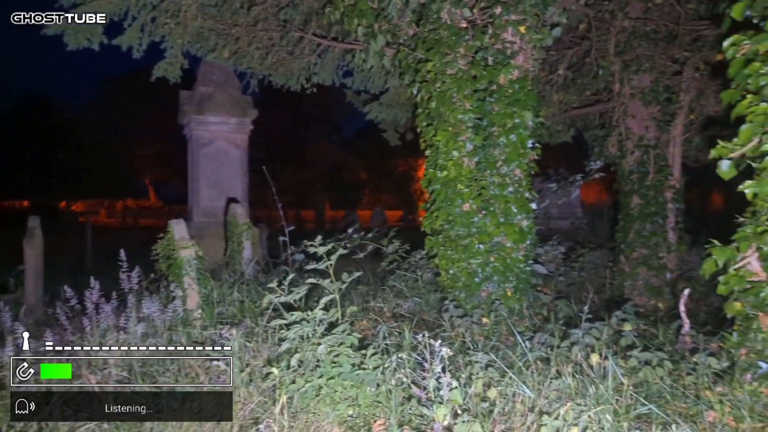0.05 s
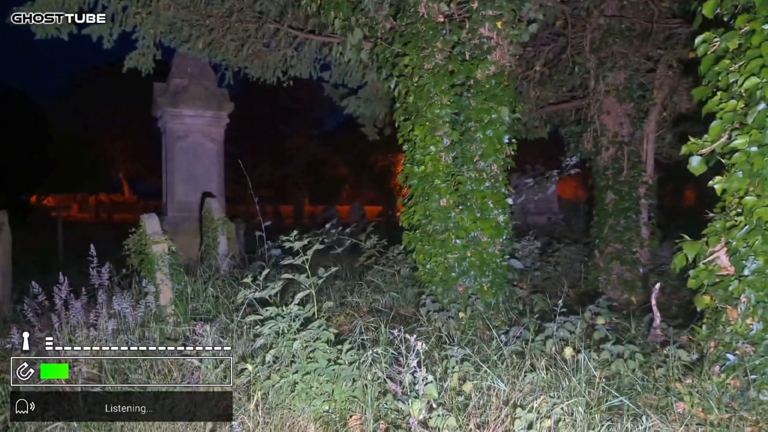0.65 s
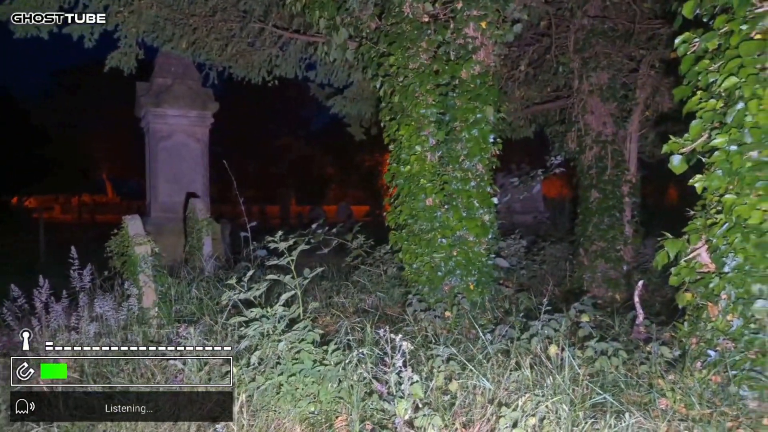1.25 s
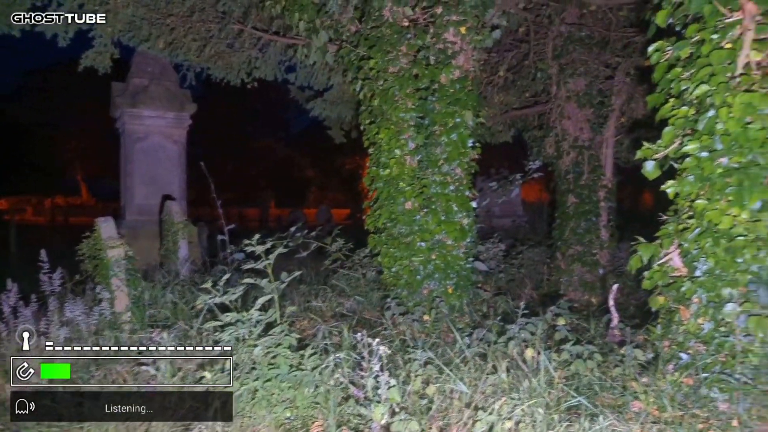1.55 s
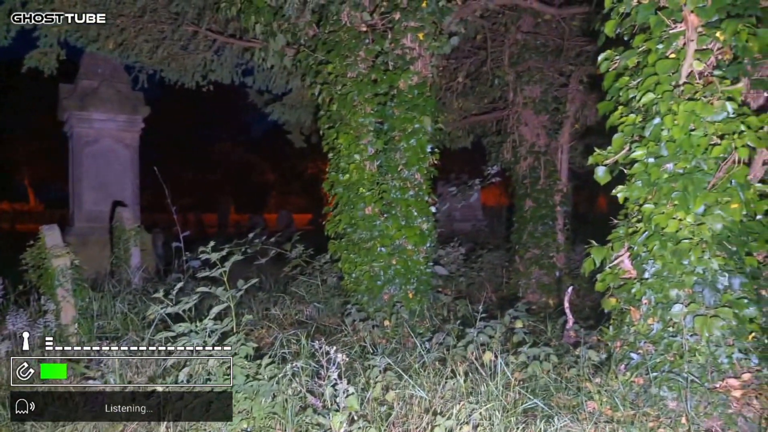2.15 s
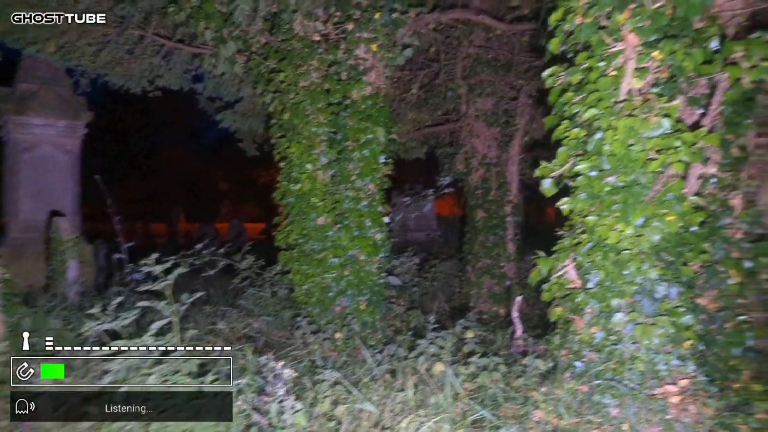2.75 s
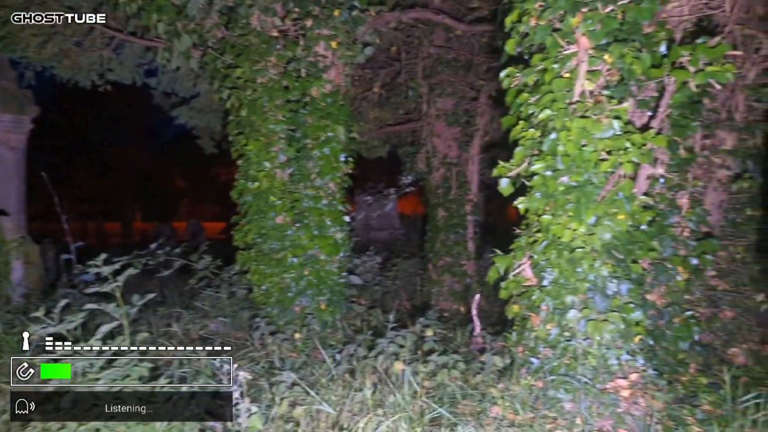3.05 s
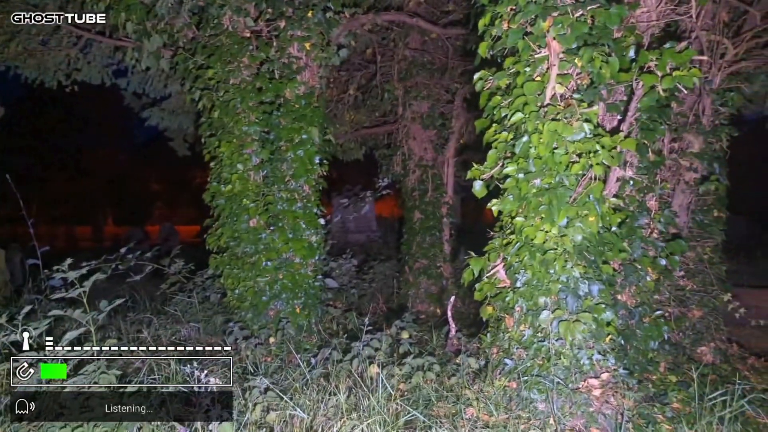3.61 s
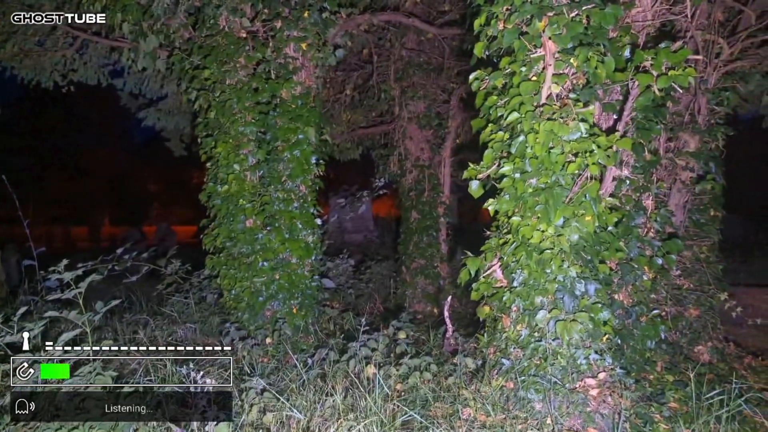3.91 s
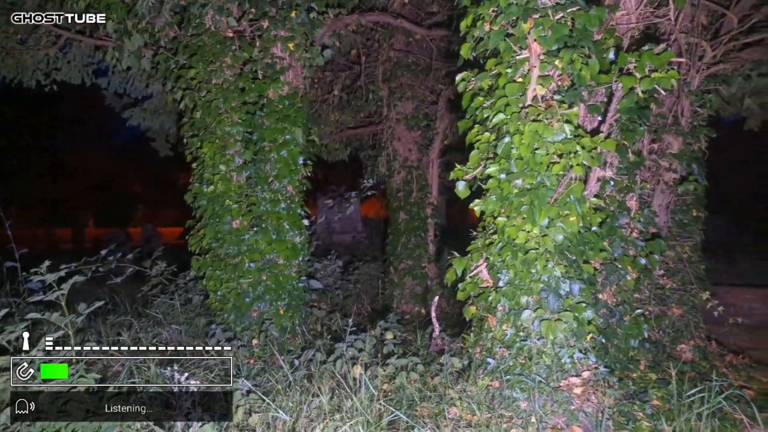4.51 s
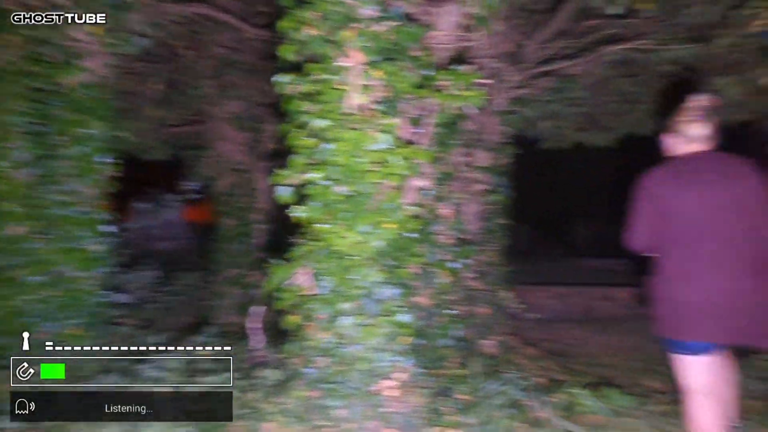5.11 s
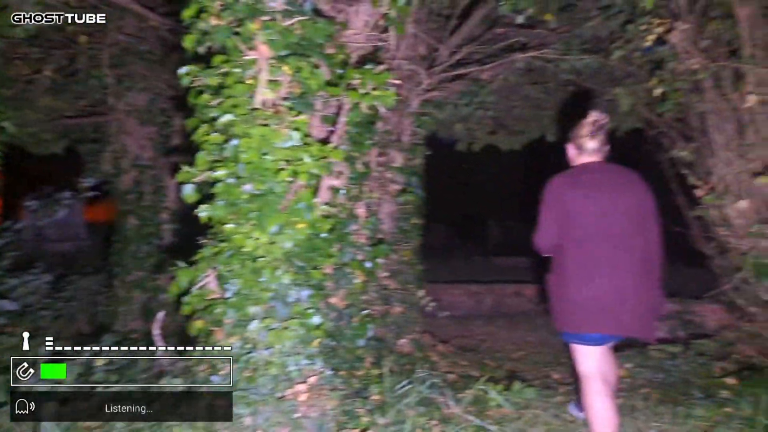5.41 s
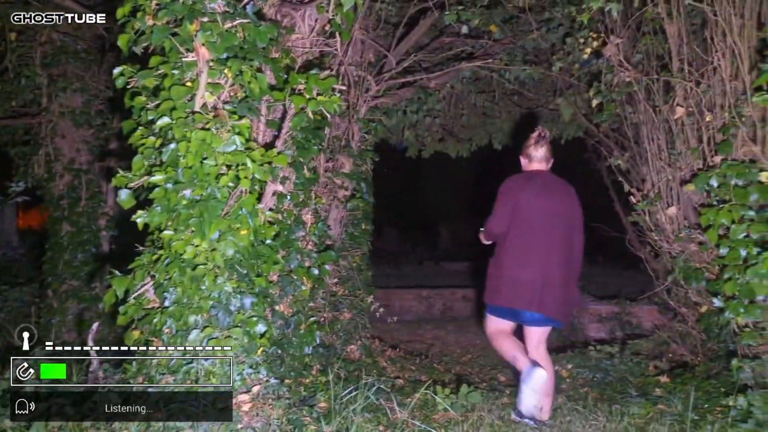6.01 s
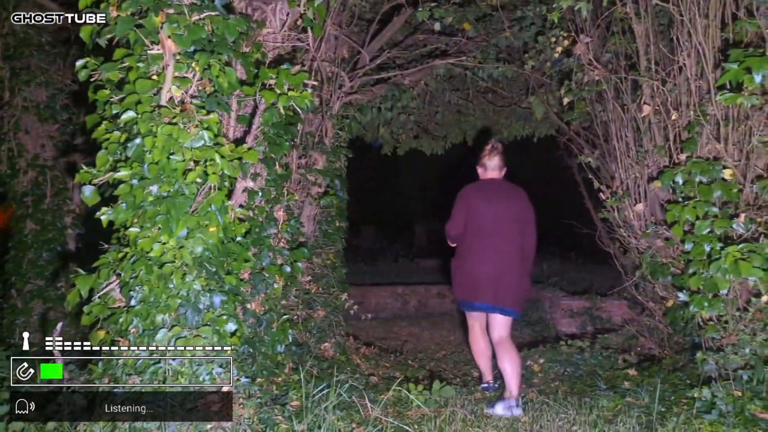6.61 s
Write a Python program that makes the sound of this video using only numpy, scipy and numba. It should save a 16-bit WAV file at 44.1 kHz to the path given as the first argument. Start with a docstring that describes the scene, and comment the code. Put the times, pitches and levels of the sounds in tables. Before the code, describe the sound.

Slow footsteps swish through long grass at night, with twigs ticking and stems cracking sharply close by over a faint low rumble.

```python
"""In long grass and undergrowth at night, someone walks slowly, close to the microphone.
Blades sweep past the legs in crackling swells, and stems crack and knock close by with a dull thump.
Twigs tick, something smooth rubs by in short rising swishes, and a soft, low rustle comes and goes.
Far traffic and a low rumble lie underneath."""
import sys
import numpy as np
from scipy import signal
from scipy.fft import rfft, irfft
from scipy.io import wavfile
from scipy.ndimage import uniform_filter1d
from numba import njit

SR = 44100
rng = np.random.default_rng(int(sys.argv[2]) if len(sys.argv) > 2 else 0)


def log_audio(samples):
    """Write samples as a 16-bit WAV file to the path given in sys.argv[1]."""
    # one column per channel
    frames = np.atleast_2d(samples).T
    # limit to full scale, then quantise
    limited = np.clip(frames, -1, 1)
    pcm = np.round(limited * 32767).astype(np.int16)
    wavfile.write(sys.argv[1], SR, pcm)


N = 298116
TIME = np.arange(N) / SR

# tone colour of scraping blades: f/Hz, relative level/dB
BLADE_SPECTRUM = [(180, -33.5), (300, 0.5), (431, -1.5), (517, -7.5), (720, -4.5), (922, -7.5),
                  (1370, -14.5), (2560, -10), (3230, -12.5), (3510, -11.5), (8990, -16), (10100, -17),
                  (11500, -15.5), (15500, -26)]
# a leg sweeps through the grass: peak t/s, level/dB, rise/s, fall/s, brightness/dB (more = more treble)
LEG_SWEEPS = [ (.8, -59, 0.14, 0.19, -14), (.95, -51.5, 0.086, 0.065, 0), (1.411, -43.5, 0.055, 0.075, 1.5),
              (1.463, -38, 0.089, 0.046, 0), (2.62, -55, 0.096, .06, -8), (2.714, -49.5, 0.064, .07, 1),
              (3.09, -38, 0.037, 0.13, 5), (3.22, -54.5, 0.21, 0.21, -7), (3.474, -42.5, 0.037, 0.053, 1),
              (3.61, -51, 0.31, 0.15, 4.5), (4.074, -45, 0.03, 0.041, -6), (4.108, -40, 0.045, 0.065, 0.5),
              (4.745, -53.5, 0.15, .11, 2.5), (5.53, -59, 0.12, 0.15, -5), (5.91, -49.5, 0.12, 0.1, 1),
              (6.51, -52.5, 0.085, 0.11, -3), (6.755, -45, 0.045, .05, -11)]
# grass stirring between the sweeps: t/s, level/dB
GRASS_STIR = [(0, -72), (2.2, -72.5), (3.1, -65.5), (3.9, -63.5), (5.0, -65.5), (6.2, -72.5), (6.76, -65)]
# stems crack close by: t/s, crack/dB, leaves/dB, thump/dB, thump f/Hz, knock/dB, tilt/(dB per octave)
STEM_CRACKS = [ (4.1018, -22, -33, -33, 155, -29.5, -2.5), (4.1547, -11.5, -28, -18, 149, -32, 3.5),
               (4.2893, -13, -25, -15, 158, -16.5, 5), (4.3376, -30, -44, -32, 160, -30.5, 2.5),
               (5.477, -41, -50, -31.5, 166, -42, -1.5), (5.756, -13.5, -27.5, -21, 104, -36, 0.5),
               (5.8249, -27, -27, -27.5, 118, -27.5, 0.5), (5.8657, -40, -39, -30, 167, -29, -2.5),
               (5.9249, -26, -23, -18, 113, -22.5, -4), (6.523, -33.5, -38, -27.5, 166, -23.5, 3)]
# tone colour of a crack: f/Hz, relative level/dB
CRACK_SPECTRUM = [(150, -20), (400, 9), (800, 5), (1400, -4.5), (2200, 8.5), (3000, 4), (5000, 3),
                  (9000, -5), (13000, -9), (16000, -14)]
# tone colour of shaken leaves: f/Hz, relative level/dB
LEAF_SPECTRUM = [(150, 7.5), (350, -8.5), (750, 0.5), (1400, -2), (2300, 1), (3200, 0.5), (5500, 0.5),
                 (9000, -3.5), (12500, -7), (16000, -19)]
# tones of the thump: multiple of its pitch, relative level/dB, t60/s (time to fade by 60 dB)
THUMP_TONES = [(.7, -22.5, 0.12), (1, -8.5, 0.1), (1.3, 1.5, 0.049), (2.1, -5.5, 0.042), (2.8, -18, 0.066)]
# tones of a thick stem, before STEM_TUNING lowers them: f/Hz, relative level/dB, t60/s
STEM_TONES = [(591, -14.5, 0.056), (734, -1, 0.023), (833, -13, 0.053), (1030, -11, 0.049)]
STEM_TUNING = 0.92
# twigs and stalks tick: t/s, level/dB, f/Hz, width/octaves, t60/s
TWIG_TICKS = [(.18, -55, 3080, 0.45, .023), (.672, -57, 3130, 0.51, 0.052), (0.779, -38.5, 750, 1.1, 0.033),
              (.982, -55, 5000, 2.3, .015), (1.479, -32.5, 3100, 0.91, 0.011),
              (1.489, -33, 4470, 2.6, 0.023), (2.807, -42, 795, 0.82, 0.0097), (2.963, -51, 2160, .7, .019),
              (3.203, -41, 695, 0.73, .045), (3.634, -36.5, 545, 1.6, 0.046), (4.057, -45, 3900, 3.2, .039),
              (4.123, -34, 4000, 0.54, .012), (4.476, -42.5, 5000, 5.6, 0.013),
              (4.551, -33, 4030, 2.2, 0.01), (4.5864, -44, 7260, 1.7, 0.091), (4.587, -35.5, 780, 1, 0.014),
              (4.6384, -30.5, 4660, 2.1, 0.0023), (4.9279, -35.5, 3000, 2.45, 0.0071),
              (5.0073, -40.5, 5300, .6, 0.0058), (5.032, -24, 2070, 1.25, 0.0039),
              (5.059, -44, 6800, .9, 0.017), (5.196, -51, 8000, 1.7, 0.011), (5.476, -35, 2470, 1.2, 0.012),
              (5.6044, -42, 7940, 5.7, 0.011), (5.728, -44.5, 4050, 2.4, .025),
              (6.118, -46.5, 8000, 1.6, 0.01)]
# rubbing swishes: peak t/s, level/dB, rise/s, fall/s, starting f/Hz, climb after the peak/(octaves per s)
RUBS = [(2.587, -38, .014, 0.038, 782, 4), (2.621, -29, 0.027, 0.025, 810, 5.4),
        (2.636, -41, 0.014, 0.011, 2100, 63), (3.292, -43, 0.029, 0.015, 930, 6),
        (4.656, -36.5, 0.026, 0.033, 760, 53), (6.718, -33, 0.0086, 0.0079, 651, 5),
        (6.733, -27, .014, 0.027, 675.6, 56)]
# soft, low swells of rustling noise: peak t/s, level/dB, rise/s, centre f/Hz
LOW_SWELLS = [(0.812, -51.5, 0.13, 665), (2.667, -53.5, 0.24, 450), (3.227, -50.5, 0.38, 600),
              (3.54, -54.5, 0.17, 584), (4.886, -46.5, 0.35, 440), (5.578, -53.5, 0.33, 450),
              (6.298, -60, 0.96, 490)]
# tyres on a far road: t/s, level/dB
TYRE_LEVELS = [(0, -62.5), (.5, -64), (1.1, -74.5), (2, -72), (6.76, -67.5)]
# tone colour of the night air: f/Hz, relative level/dB
AIR_SPECTRUM = [(20, 3), (52, 1), (80, -9), (110, -10.5), (170, -15), (215, -13.5), (300, -18.5),
                (580, -24.5), (950, -29.5), (1350, -40), (2200, -46), (6000, -57.5), (13000, -60),
                (15500, -51)]
# the bass swells and sinks: t/s, change in level/dB
BASS_SWELLS = [(0, -1), (.8, 3.5), (1.1, 0), (2.2, -1), (2.6, 3.5), (3.2, -1), (4.7, 2), (5.3, -.5),
               (6.76, 1)]


def grass():
    """Blades scrape in dense clicks and now and then one catches; each leg sweep swells and dies away."""
    snags = crackle(rate=61, spread_db=1.6)
    burst = rng.standard_normal(SR // 100) * fade(TIME[:SR // 100], 0.024)
    catches = unit(signal.fftconvolve(snags, burst)[:N])
    scraping = crackle(rate=6000, spread_db=2.7)
    blades = colour(unit(scraping + undb(-10) * catches), BLADE_SPECTRUM)
    treble = signal.sosfiltfilt(signal.butter(2, 5500, "high", fs=SR, output="sos"), blades)
    moves = [(undb(db) * swell(s, rise, fall, shape=1.42), bright_db)
             for s, db, rise, fall, bright_db in LEG_SWEEPS]
    moves.append((undb(curve(GRASS_STIR)), -5))  # the stirring is a little dull
    # brightness shares the power between the treble and the rest
    high = sum(gain ** 2 / (1 + undb(-2 * bright_db)) for gain, bright_db in moves)
    low = sum(gain ** 2 / (1 + undb(2 * bright_db)) for gain, bright_db in moves)
    rustle = np.sqrt(2 * high) * treble + np.sqrt(2 * low) * (blades - treble)
    return rustle * undb(1.75 * waver(130))


def cracking_stems():
    """Stems crack and knock close to the microphone with a dull thump, and the leaves around shiver."""
    out, t = np.zeros(N), TIME[:SR // 4]
    for s, crack_db, shiver_db, thump_db, thump_hz, knock_db, tilt_db in STEM_CRACKS:
        crack = np.sign(rng.standard_normal(len(t))) * fade(t, 0.0057)
        crack[0] = -3.0  # the first fibre to give is the sharpest
        shiver = crackle(rate=9000, spread_db=1.5, count=len(t))
        shiver *= (1 - np.exp(-t / 0.001)) * fade(t, 0.081)
        add(out, s, undb(crack_db) * colour(crack, CRACK_SPECTRUM, tilt_db))
        add(out, s, undb(shiver_db) * colour(shiver, LEAF_SPECTRUM, tilt_db))
        add(out, s, undb(thump_db) * ring(t, THUMP_TONES, thump_hz, jitter=0.042))
        add(out, s, undb(knock_db) * ring(t, STEM_TONES, STEM_TUNING, jitter=0.086))
    return out


def twig(db, hz, octaves, t60):
    """A thin stalk clicks in a band around its pitch and shakes the leaves it carries."""
    t = TIME[:SR // 6]
    fibres = np.sign(rng.standard_normal(len(t))) * fade(t, t60)
    fibres[0] = 2.74  # one fibre snaps first, then the smaller ones part
    click = band(fibres, hz / 2 ** (octaves / 2), hz * 2 ** (octaves / 2))
    click += undb(-18.5 + 6.5 * np.log2(hz / 4000)) * fibres  # thin dry stalks break more sharply
    click *= np.linalg.norm(fibres) / np.linalg.norm(click)
    wood = band(fibres, 720, 2560)
    shiver = crackle(rate=4600, spread_db=2.4, count=len(t))
    leaves = band(shiver, hz / 1.66, hz * 1.23, order=1) * fade(t, 0.11)
    return undb(db) * (click + undb(-2.0) * wood + undb(-8.5) * leaves)


def twigs(faint_count=10, faint_from_s=3.3, faint_to_s=6.4):
    """Clear ticks, and faint ones at random as trodden stalks spring back behind the walker."""
    out = np.zeros(N)
    for s, db, hz, octaves, t60 in TWIG_TICKS:
        add(out, s, twig(db, hz, octaves, t60))
    for when, size, pitch in rng.random((faint_count, 3)):
        tick = twig(db=-60 + 6 * size, hz=4500 * 2 ** (pitch - .5), octaves=1.8, t60=.02)
        add(out, faint_from_s + when * (faint_to_s - faint_from_s), tick)
    return out


def swishes(highest_hz=2900):
    """Fine ribs grip, then slip over each other ever faster: a rasping tone rises inside a broad hiss."""
    out = np.zeros(N)
    for s, db, rise, fall, start_hz, climb in RUBS:
        on = (TIME >= s - 2 * rise) & (TIME <= s + 2 * fall)
        hz = np.minimum(start_hz * 2 ** (climb * np.maximum(TIME[on] - s, 0)), highest_hz)
        # uneven ribs make the pitch and the grip waver
        phase = 2 * np.pi * np.cumsum(hz * (1 + 0.1184 * waver(700)[on])) / SR
        tone = unit(np.sin(phase) + undb(-23.5) * np.sin(2 * phase) + undb(-15.5) * np.sin(3 * phase))
        noise = rng.standard_normal(len(hz))
        hiss = unit(resonate(resonate(noise, hz), hz) / np.sqrt(hz))
        grip = undb(-3 + 2.5 * waver(300)[on])
        rasp = grip * tone + undb(-3) * hiss
        out[on] += undb(db) * swell(s, rise, fall, shape=0.87)[on] * rasp
    return out


def low_rustle():
    """Soft, low swells of rustling noise, each fading more slowly than it rises."""
    out, clicks = np.zeros(N), crackle(rate=1500, spread_db=2.36)
    for s, db, rise, hz in LOW_SWELLS:
        centre = np.full(N, float(hz))
        rustle = unit(resonate(resonate(clicks, centre), centre))
        out += rustle * undb(db) * swell(s, rise, 1.45 * rise, shape=1.09)
    return out * undb(1.6 * waver(30))


def far_road(tyre_hz=1026):
    """Far tyres sing in one narrow band; they fade away and partly come back."""
    tyres = unit(band(rng.standard_normal(N), tyre_hz / 1.206, tyre_hz * 1.087))
    return tyres * undb(curve(TYRE_LEVELS) + waver(14))


def night_air(air_db=-40.5, drone_db=-47):
    """Low outdoor rumble and faint hiss; each band wavers on its own and the bass swells."""
    hz = np.arange(N // 2 + 1) * SR / N
    bass_db = curve(BASS_SWELLS)
    spectrum = rfft(rng.standard_normal(N)) * undb(spectrum_db(AIR_SPECTRUM, hz)) * (hz > 15)
    half_octave = np.floor(2 * np.log2(np.clip(hz, 32, 2048)))
    air = np.zeros(N)
    for k in np.unique(half_octave):
        is_bass = 2 ** (k / 2) < 100
        air += irfft(spectrum * (half_octave == k), N) * undb(.5 * waver(3) + bass_db * is_bass)
    drone = unit(band(rng.standard_normal(N), 39.6, 62.6))
    return unit(air) * undb(air_db) + drone * undb(drone_db + bass_db)


def crackle(rate, spread_db, count=N):
    """Tiny clicks at random, about `rate` a second, mostly small and a few large."""
    hit = rng.random(count) < rate / SR
    strength = undb(spread_db * np.minimum(rng.exponential(size=count), 5))
    return unit(hit * strength * np.sign(rng.standard_normal(count)))


def ring(t, tones, scale, jitter):
    """Fading tones struck together, each a little off its usual pitch."""
    out = np.zeros(len(t))
    for pitch, db, t60 in tones:
        hz = pitch * scale * (1 + jitter * rng.standard_normal())
        out += undb(db) * fade(t, t60) * np.sin(2 * np.pi * hz * t)
    return out


def swell(s, rise_s, fall_s, shape):
    """A gain of 1 at time s, a tenth one rise before and one fall after; shape 1 is pointed, 2 round."""
    away = np.maximum((s - TIME) / rise_s, (TIME - s) / fall_s)
    return 10 ** -np.minimum(away ** shape, 10)


def fade(t, t60):
    """Die away by 60 dB every t60 seconds."""
    return np.exp(-np.log(1000) * t / t60)


def waver(rate):
    """A smooth random wobble of size about 1, with `rate` new values a second."""
    hold = max(int(SR / rate), 1)
    steps = np.repeat(rng.standard_normal(N // hold + 1), hold)
    return unit(uniform_filter1d(uniform_filter1d(steps, hold), hold)[:N])


def colour(x, points, tilt_db=0, size=1024):
    """Give a sound a tone colour; tilt_db adds that much per octave above 500 Hz."""
    hz = np.maximum(np.arange(size // 2 + 1) * SR / size, 20)
    db = spectrum_db(points, hz) + tilt_db * np.log2(np.maximum(hz, 500) / 2000)
    # build the filter so that it rings only after a click, never before
    cepstrum = irfft(np.log(undb(db)))
    cepstrum[1:size // 2] *= 2
    cepstrum[size // 2 + 1:] = 0
    response = irfft(np.exp(rfft(cepstrum)))
    return signal.fftconvolve(x, response / np.linalg.norm(response))[:len(x)]


def band(x, lo_hz, hi_hz, order=2):
    """Keep what lies between two frequencies."""
    edges = np.clip([lo_hz, hi_hz], [5, 10], [SR * .47, SR * .49])
    return signal.sosfilt(signal.butter(order, edges, "band", fs=SR, output="sos"), x)


@njit
def resonate(x, hz):
    """Keep a broad band around a frequency that may move."""
    out, band_state, low_state = np.empty(len(x)), 0., 0.
    for i in range(len(x)):
        tuning = np.tan(np.pi * hz[i] / SR)
        out[i] = (band_state + tuning * (x[i] - low_state)) / (1 + tuning * (tuning + 1))
        band_state = 2 * out[i] - band_state
        low_state += 2 * tuning * out[i]
    return out


def spectrum_db(points, hz):
    """Read the level at hz from a tone colour table, with octaves evenly spaced."""
    f, db = np.transpose(points)
    return np.interp(np.log(np.maximum(hz, 1)), np.log(f), db)


def curve(table):
    """Join (time, value) points with straight lines."""
    return np.interp(TIME, *np.transpose(table))


def undb(db):
    """Turn decibels into a gain."""
    return 10 ** (np.asarray(db) / 20)


def unit(x):
    """Scale to an average power of 1."""
    return x / np.sqrt(np.mean(x ** 2) + 1e-20)


def add(out, s, sound):
    """Mix a sound in at time s."""
    i = max(int(s * SR), 0)
    out[i:i + len(sound)] += sound[:max(N - i, 0)]


def scene():
    """All sources at one microphone."""
    return (grass() + low_rustle() + cracking_stems() + twigs() + swishes() + far_road() + night_air())[None]


def record(dry, soften_hz=14300, top_hz=15600):
    """The microphone softens the highest treble and the recorder cuts the top."""
    soft = signal.sosfilt(signal.butter(5, soften_hz, fs=SR, output="sos"), dry)
    return signal.sosfilt(signal.ellip(10, .1, 70, top_hz, fs=SR, output="sos"), soft)


dry = scene()
out = record(dry)
log_audio(out)
```